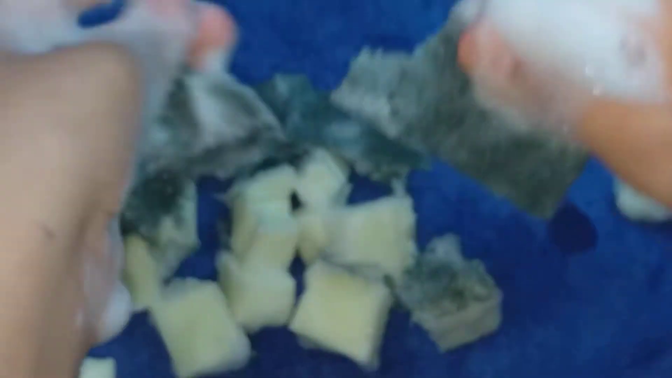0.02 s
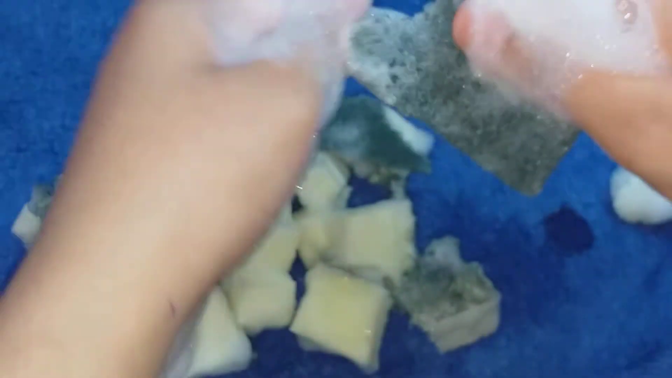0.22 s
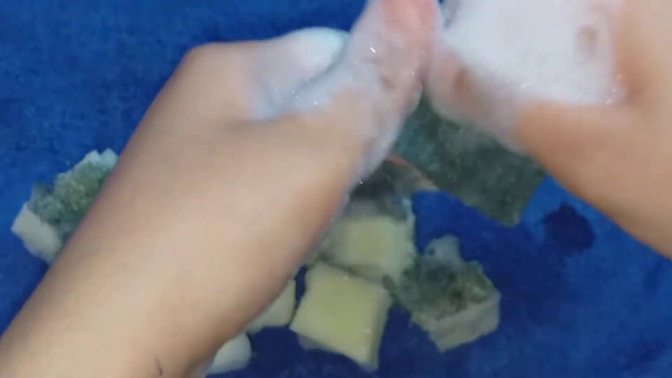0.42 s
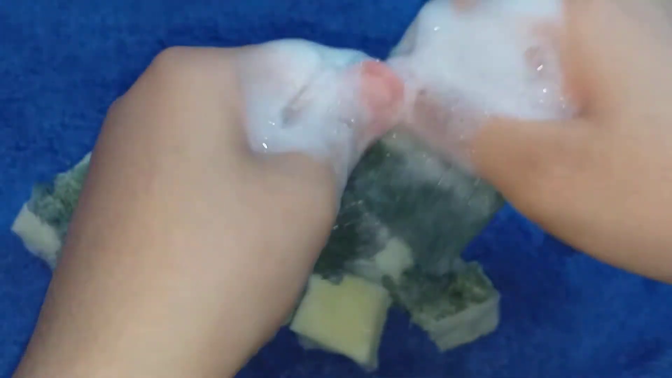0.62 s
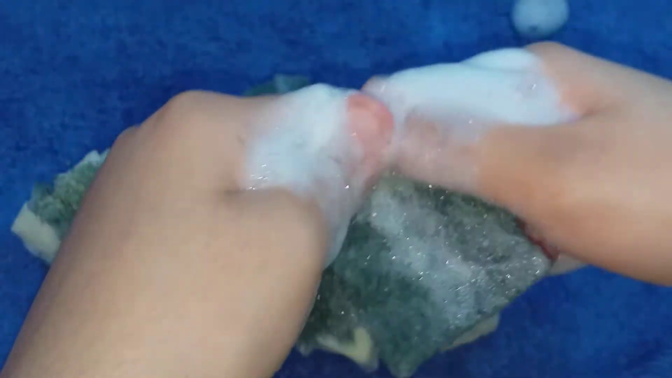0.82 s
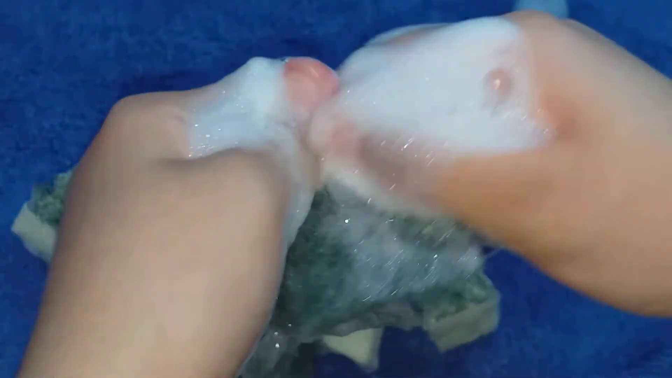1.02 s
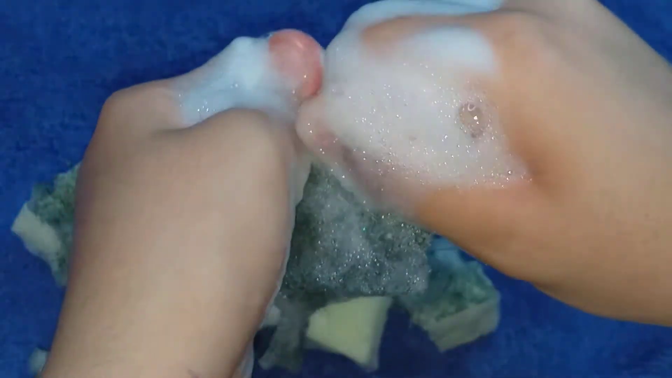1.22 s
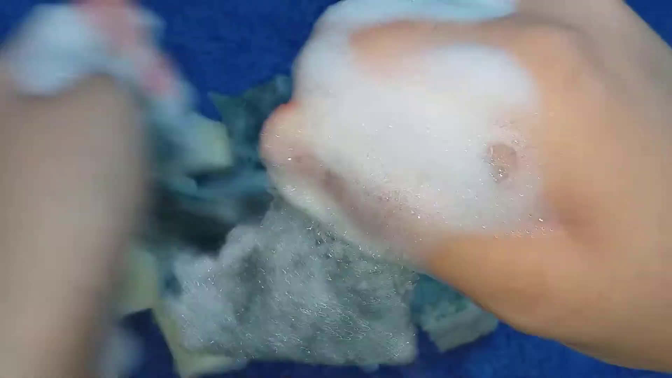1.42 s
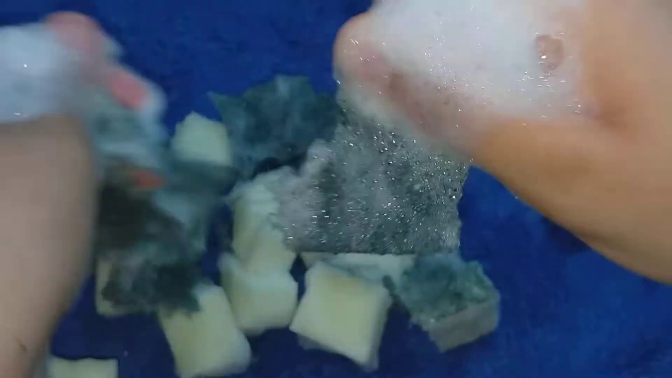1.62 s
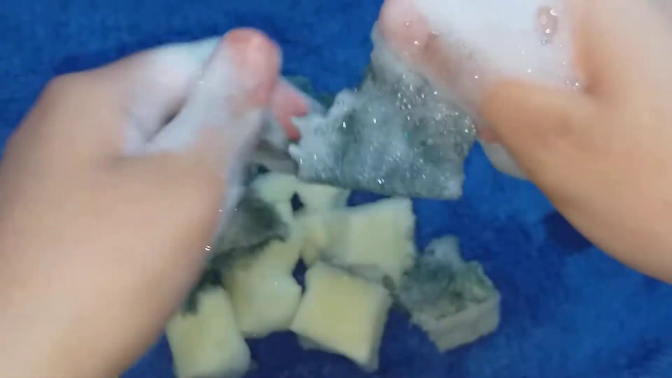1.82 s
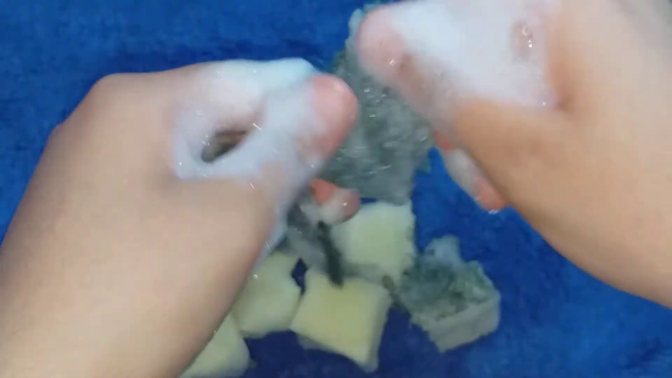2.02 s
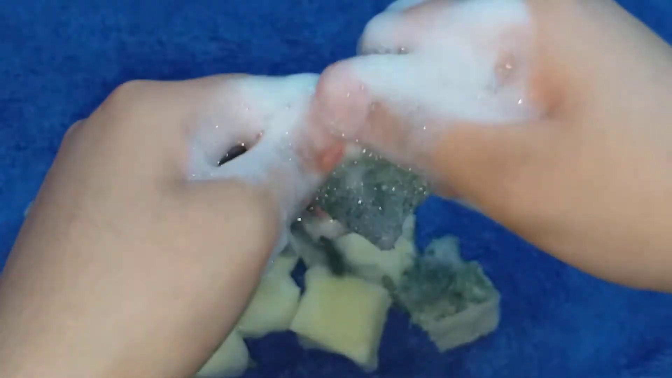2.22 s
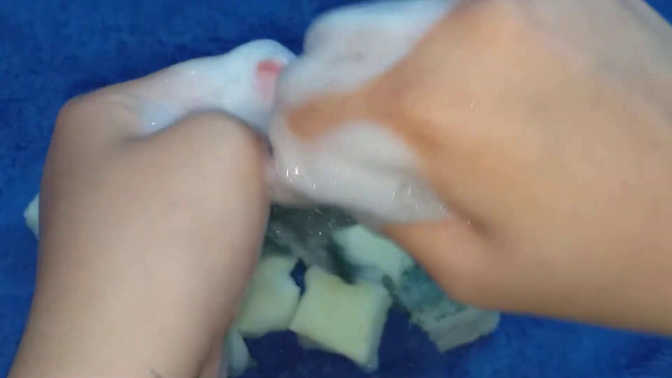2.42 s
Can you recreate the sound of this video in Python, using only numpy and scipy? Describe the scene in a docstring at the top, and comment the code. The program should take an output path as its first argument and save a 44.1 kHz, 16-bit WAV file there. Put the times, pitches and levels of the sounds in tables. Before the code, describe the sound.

A soapy scouring pad is torn by hand: a few hard knocks and faint creaks, then quickening fibre snaps and a short bright rip, then quiet foam fizz; close phone microphone in a small quiet room.

```python
"""Soapy hands tear a scouring pad close to a phone in a small quiet room: fibres snap one by one, then
the pad rips through. Snaps are bursts of noise with a short ring; tearing is clumps of tiny clicks.
The phone's mount creaks and knocks (damped sines), and foam fizzes and squishes (filtered clicks).
Low rumble, hiss and a chopped electric whine lie beneath (shaped noise and pulsed sines)."""
import sys
import numpy as np
from scipy import signal
from scipy.fft import rfft, irfft
from scipy.io import wavfile
from scipy.ndimage import map_coordinates

SR = 44100
rng = np.random.default_rng(int(sys.argv[2]) if len(sys.argv) > 2 else 0)


def invert_db(level):
    """Linear amplitude ratio for a level in decibels (20 dB per decade), elementwise."""
    return 10 ** (np.asarray(level, dtype=float) / 20)


def file_out(sig):
    """Save sig as 16-bit WAV at sys.argv[1]."""
    # one column per channel
    cols = np.atleast_2d(sig).T
    # limit, then scale
    lim = np.clip(cols, -1, 1)
    pcm = np.round(lim * 32767).astype(np.int16)
    wavfile.write(sys.argv[1], SR, pcm)


N = 110250  # samples: 2.5 s
T = np.arange(N) / SR

# colour of the hiss, also used for the noise in the whine: f/Hz, level/dB
HISS_COLOUR = [(250, -34), (400, -3.5), (700, 4.5), (1200, -8), (2000, -15), (3700, 6), (6000, -25),
               (7800, -1), (9800, 3), (11500, -5.5), (13600, -18), (15500, 3)]
# colour of coarse fibres breaking: f/Hz, level/dB
COARSE_FIBRES = [(350, -36), (600, -32), (1010, -8), (1160, -9), (1510, 0), (2290, -2), (2780, -7.5),
                 (3370, 2), (5010, -1), (6800, -17), (8840, -48), (15000, -120)]
# colour of fine fibres breaking: f/Hz, level/dB
FINE_FIBRES = [(3530, -16.5), (6000, -6), (6730, -17), (7280, -4.5), (10800, 0.5), (11100, -6),
               (12900, -12.5), (16000, -30)]


def unit(x):
    """Scales a sound to rms 1."""
    return x / np.sqrt(np.mean(x ** 2) + 1e-20)


def along(points, hz):
    """Reads a curve of (Hz, value) points on a log frequency axis."""
    f, v = np.transpose(points)
    return np.interp(np.log(hz + 1), np.log(f + 1), v)


def curves(rows):
    """Draws straight lines between timed rows: one value per sample for each column."""
    s, *cols = np.transpose(rows)
    return [np.interp(T, s, c) for c in cols]


def wobble(rate):
    """A smooth random curve with rate knots a second."""
    knots = rng.standard_normal(int(N * rate / SR) + 4)
    return map_coordinates(knots, [T * rate])


def noise():
    """Plain white noise for the whole scene."""
    return rng.standard_normal(N)


def coloured(x, spectrum):
    """Filters x to this spectrum without sounding ahead of time; white input keeps its rms."""
    m = 4096
    gain = invert_db(along(spectrum, np.fft.rfftfreq(m, 1 / SR)))
    # folding the cepstrum (spectrum of the log gain) forward gives a minimum-phase filter
    cepstrum = irfft(np.log(np.maximum(gain, 1e-5)), m)
    cepstrum = cepstrum * np.r_[1, 2 * np.ones(m // 2 - 1), 1, np.zeros(m // 2 - 1)]
    h = irfft(np.exp(rfft(cepstrum)), m)
    return signal.fftconvolve(x, h / np.linalg.norm(h))[:len(x)]


def grains(rate, spread_db, air):
    """Random clicks of uneven size, about rate a second, over a share (air) of plain noise."""
    sizes = invert_db(spread_db * rng.exponential(size=N)) * noise()
    clicks = (rng.random(N) < rate / SR) * sizes
    return unit(unit(clicks) + air * noise())


def ring(t, hz, db, t60, rise=0):
    """A struck part rings as a damped sine; its pitch gains 2 * rise of itself each second."""
    onset = 1 - np.exp(-t / 0.00012)
    return invert_db(db - 60 * t / t60) * np.sin(2 * np.pi * hz * t * (1 + rise * t)) * onset


def struck(t, modes, scrape):
    """A blow and a short scrape ring the modes, a little differently every time; peak 1."""
    scrape_peak_s, scrape_width_s, scrape_top_hz = 0.0013, 0.0018, 8600
    u = T[:SR // 200]
    swell = np.exp(-((u - scrape_peak_s) / scrape_width_s) ** 2)
    force = 0.25 * scrape * rng.standard_normal(len(u)) * swell
    force[0] = 1  # the blow itself
    if scrape > 1:
        force = signal.sosfilt(signal.butter(4, scrape_top_hz, fs=SR, output="sos"), force)
    x = sum(ring(t, *mode) * invert_db(rng.standard_normal()) for mode in modes)
    x = signal.fftconvolve(x, force)[:len(t)]
    return x / np.abs(x).max()


def add(out, s, x):
    """Mixes x into out at time s."""
    part = out[round(s * SR):][:len(x)]
    part += x[:len(part)]


def rumble():
    """Low noise whose level drifts."""
    # colour: f/Hz, level/dB
    rumble_colour = [(30, -3), (60, -1), (95, -12), (125, 2), (155, 1), (180, -14.5), (250, -9.5),
                     (330, -19.5), (600, -29.5), (1000, -72)]
    # loudness, before the 2 dB lift and wobble below: t/s, level/dB
    rumble_path = [(0.5, -65), (0.55, -68.5), (0.789, -67.5), (1.04, -65), (1.42, -71), (1.59, -70.5),
                   (1.72, -70), (1.95, -71), (2.31, -68.5), (2.5, -69)]
    level_db = curves(rumble_path)[0] + 2.0 + 0.26 * wobble(24)
    return invert_db(level_db) * unit(coloured(noise(), rumble_colour))


def hiss():
    """Steady coloured noise with a slight wobble in level."""
    return invert_db(-81.5 + 0.77 * wobble(15)) * coloured(noise(), HISS_COLOUR)


def whine():
    """Four electric tones and a spit of noise, switched on briefly many times a second."""
    # one pitch per tone: f/Hz
    tone_hz = [3351.8, 7302.5, 9156.9, 11311.4]
    # one level per tone, before the shared wobble: level/dB
    tone_db = [-78, -85, -75, -80]
    chop_hz, chop_start_s = 299.27, 0.003054
    tone_sharp, spit_sharp = 18, 36  # higher makes shorter pulses
    gate = np.cos(2 * np.pi * chop_hz * (T - chop_start_s)) - 1
    out = np.zeros(N)
    for hz, db in zip(tone_hz, tone_db):
        tone = np.sin(2 * np.pi * (hz * T + rng.random()))
        out += invert_db(db) * unit(np.exp(tone_sharp * gate) * tone)
    spit = unit(np.exp(spit_sharp * gate) * noise())
    out += invert_db(-76) * coloured(spit, HISS_COLOUR)
    return invert_db(0.48 * wobble(45.6)) * out


def fizz():
    """Tiny bubbles burst in the lather: a dense stream of clicks with a fluttering level."""
    # loudness, before the 10.5 dB cut and flutter below: t/s, level/dB
    fizz_path = [(0.0, -56.5), (0.8, -60), (1.08, -59.5), (1.2, -60.5), (1.33, -98), (1.36, -48),
                 (1.5, -58), (1.8, -61), (2.05, -63), (2.5, -58.5)]
    # colour: f/Hz, level/dB
    fizz_colour = [(470, -54.5), (800, -20), (1030, -10), (2110, -8), (2570, -10), (3960, -5.5),
                   (6760, -12), (10100, -4.5), (13000, -12.5)]
    flutter_db = 1.2 * wobble(40)
    return invert_db(curves(fizz_path)[0] - 10.5 + flutter_db) * coloured(grains(5700, 1.5, 1.2), fizz_colour)


def squishes():
    """Now and then the foam squishes: bubble clicks in one band swell and fade."""
    # middle, width of the swell, loudness and centre of the band: t/s, length/s, level/dB, f/Hz
    squish_rows = [(0.768, 0.041, -69, 1860), (1.716, 0.12, -78, 1460), (2.165, 0.049, -74, 1920),
                   (2.424, 0.14, -68, 3870)]
    out = np.zeros(N)
    for s, length, db, hz in squish_rows:
        band = [(hz / 1.4, -40), (hz / 1.3, -6), (hz, 0), (hz * 1.4, -6), (hz * 3.3, -25)]
        swell = np.exp(-(2 * (T - s) / length) ** 2)
        out += invert_db(db) * swell * coloured(grains(1300, 1.0, 0.34), band)
    return out


def creaks():
    """Faint creaks of the mount ring a hollow part, each with a small tick."""
    # each creak, levels before the trims below: t/s, level/dB, tick against hollow ring/dB
    creak_rows = [(0.621, -48.5, -4.5), (0.688, -51.5, -7), (0.697, -46.5, -11.5), (0.708, -50, -4),
                  (0.796, -54, -4), (0.841, -65, -1), (0.887, -56.5, 0.5), (0.984, -65, -17),
                  (1.047, -50.5, -5.5), (1.083, -59, -5)]
    # rings of the hollow part: f/Hz, relative level/dB, t60/s
    hollow_modes = [(997, 4.5, 0.021), (1357, -5.5, 0.023), (526, -19, 0.027)]
    # rings of the tick: f/Hz, relative level/dB, t60/s
    tick_modes = [(4440, -0.5, 0.0017), (7020, -6, 0.0035), (7670, -8.5, 0.0038)]
    out, t = np.zeros(N), T[:SR // 8]
    onset = 1 - np.exp(-t / 0.00066)
    for s, db, tick_db in creak_rows:
        shift = 1 + 0.015 * rng.standard_normal()  # every creak differs slightly in pitch
        hollow = sum(ring(t, hz * shift, g + 2 * rng.standard_normal(), t60)
                     for hz, g, t60 in hollow_modes) * onset
        tick = invert_db(tick_db + 7) * struck(t, tick_modes, 2.3)
        add(out, s, invert_db(db - 1.5) * (hollow + tick))
    return out


def knocks():
    """Each knock of the mount rings the case and pushes the body; only the hardest set off a low thump."""
    # each knock: t/s, case peak/dB, main ring f/Hz, scrape strength, body against case peak/dB
    knock_rows = [(.0140, -33, 7100, 1.3, -7.5), (0.0722, -27, 1410, 2, -29),
                  (0.1492, -42.5, 8000, 2.4, -16), (0.2065, -22, 3540, 0.39, -8.5),
                  (0.2158, -33, 3600, 0.39, 0.5), (0.2752, -10.5, 4660, 0.13, -33),
                  (0.2803, -8.5, 4430, 0.16, -14.5), (.4006, -25.5, 6060, 5.8, -7),
                  (0.4803, -33, 3700, 5.4, -8)]
    # rings of the case: f/Hz, relative level/dB, t60/s
    case_modes = [(4354, 6.5, 0.0024), (6777, -0.5, 0.0031), (2408, -5, 0.0032), (1410, -22, 0.0049),
                  (7650, -4, 0.0031), (3500, -3.5, 0.00098)]
    # rings of the body: f/Hz, relative level/dB, t60/s
    body_modes = [(188, 1.5, 0.006), (322, -10.5, 0.016), (747, -15.5, 0.029), (1030, -32.5, 0.0083)]
    # thump: f/Hz, level at a -9.5 dB knock/dB, t60/s
    thump_mode = (122, -30.5, 0.028)
    main_t60_s, main_rise = 0.0034, 5.06
    thump_growth = 9.1  # dB per dB of knock: softer knocks have no audible thump
    out, t = np.zeros(N), T[:SR // 8]
    body = -sum(ring(t, *mode) for mode in body_modes)
    for s, db, hz, scrape, body_db in knock_rows:
        case = struck(t, case_modes + [(hz, 3, main_t60_s, main_rise)], scrape)
        add(out, s, invert_db(db) * (case + invert_db(body_db) * body))
        add(out, s, -invert_db(thump_growth * (db + 9.5)) * ring(t, *thump_mode))
    return out


def room(x):
    """Echoes blur into a tail of noise in which each frequency dies at its own speed."""
    # how long the room rings: f/Hz, t60/s
    room_t60 = [(300, 0.38), (2000, 0.27), (6000, 0.2), (14000, 0.11)]
    hz, t, z = signal.stft(rng.standard_normal(SR // 3), SR, nperseg=256)
    fade = invert_db(-60 * t / along(room_t60, hz)[:, None])
    tail = signal.istft(z * fade, SR, nperseg=256)[1]
    return signal.fftconvolve(x, tail / np.linalg.norm(tail))[:N]


def shudder():
    """The pad shudders as it gives: low noise in a few quick swells."""
    # loudness: t/s, level/dB
    shudder_path = [(1.35, -110), (1.375, -61.5), (1.41, -55), (1.42, -42.5), (1.44, -64), (1.462, -48.5),
                    (1.475, -66), (1.5, -84), (1.54, -110)]
    # colour: f/Hz, level/dB
    shudder_colour = [(60, -7), (130, -4), (300, -5), (500, -12.5), (800, -1.5), (1200, -32.5)]
    return invert_db(curves(shudder_path)[0]) * coloured(noise(), shudder_colour)


def snaps():
    """Each single fibre cracks as a burst of noise and rings briefly; fine ones crack brighter."""
    # each fibre, level before the 2 dB cut and 0.7 ms delay below: t/s, level/dB, f/Hz
    snap_rows = [(0.5787, -51.5, 4200), (1.125, -50, 3830), (1.1665, -41, 5060), (1.1697, -36, 1920),
                 (1.1754, -43, 4030), (1.1824, -43, 3940), (1.192, -38, 4130), (1.196, -44, 3000),
                 (1.2004, -33, 4370), (1.2078, -27.5, 4200), (1.2228, -31, 5400), (1.2297, -37, 4130),
                 (1.236, -41, 4180), (1.244, -40, 3000), (1.2487, -31.5, 3500), (1.268, -34, 4270),
                 (1.2715, -29.5, 3740), (1.2782, -43, 3610), (1.2927, -35, 5300), (1.3096, -33, 3870),
                 (1.3152, -43, 4030), (1.3252, -36.5, 4970), (1.3622, -40, 3450), (1.3678, -30, 4280),
                 (1.3725, -29, 3500), (1.376, -23, 3400), (1.3798, -21, 2000), (1.3835, -21, 3700),
                 (1.4159, -17, 9100), (1.4208, -21, 9000), (1.44, -18, 8000), (1.4465, -21, 9800),
                 (1.4548, -21, 10500), (1.4606, -21, 9800), (2.033, -55, 3950), (2.249, -55, 4020),
                 (2.4304, -44, 4220), (2.438, -48, 4250), (2.4618, -43, 4050), (2.4678, -42, 4090)]
    fine_hz, top_hz = 7000, 13000  # a fibre ringing above the first counts as fine
    crack_t60_s, ring_t60_s = 0.0055, 0.004
    out, t = np.zeros(N), T[:SR // 25]
    onset = 1 - np.exp(-t / 0.000082)
    for s, db, hz in snap_rows:
        fine_db = 5 if hz > fine_hz else -5
        colour = [p for p in COARSE_FIBRES if p[0] < fine_hz]
        colour += [(f, g + fine_db) for f, g in FINE_FIBRES if fine_hz < f < top_hz]
        colour += [(15000, -40.5)]
        crack = coloured(invert_db(-60 * t / crack_t60_s) * rng.standard_normal(len(t)), colour)
        x = crack / np.abs(crack).max() + ring(t, hz, -3, ring_t60_s) * onset
        add(out, s + 0.0007, invert_db(db - 2) * x)
    return out


def tearing(rows, rate, spread_db, air, clumps_per_s, steady):
    """Fibres break in sudden clumps that die away; coarse ones feed a lower band, fine ones an upper."""
    level_db, treble_db = curves(rows)
    starts = (rng.random(N) < clumps_per_s / SR) * rng.random(N)
    decay = np.exp(-T[:SR // 40] / 0.0015)  # one clump dies away in milliseconds
    clumps = unit(signal.fftconvolve(starts, decay)[:N])
    clumps = unit(steady + clumps)
    coarse = coloured(clumps * grains(rate, spread_db, air), COARSE_FIBRES)
    fine = coloured(clumps * grains(rate, spread_db, air), FINE_FIBRES)
    x = coarse + invert_db(treble_db) * fine
    return x * invert_db(level_db) * (T > rows[0][0]) * (T < rows[-1][0])


def stretch():
    """The pulled pad stretches: sparse, uneven fibre breaks."""
    # pull on the pad, level before the 1.5 dB cut below: t/s, level/dB, treble against it/dB
    stretch_path = [(1.1, -70.5, -25), (1.142, -67, -15), (1.15, -71, -21), (1.17, -77, 5),
                    (1.184, -64.5, 2), (1.208, -49, -8.5), (1.26, -57.5, -3), (1.272, -46, -13),
                    (1.286, -63, -2), (1.33, -64.5, -2), (1.352, -63, -16), (1.355, -68, -25)]
    return invert_db(-1.5) * tearing(stretch_path, 2000, 2.5, 0.4, clumps_per_s=500, steady=0.65)


def rip():
    """The pad rips through: dense, more even fibre breaks."""
    # force of the rip, level before the 0.5 dB lift below: t/s, level/dB, treble against it/dB
    rip_path = [(1.367, -55, -14), (1.372, -40.5, -13), (1.378, -36, -13), (1.39, -34, -12),
                (1.41, -35, 1.5), (1.4155, -43, 4.5), (1.43, -39, 1.5), (1.443, -41, 6.5), (1.455, -44, 9),
                (1.461, -48.5, 10), (1.4625, -79, -12)]
    return invert_db(0.5) * tearing(rip_path, 8000, 1.2, 0.7, clumps_per_s=500, steady=1.35)


def scene():
    """Everything at one microphone; only the tearing pad gets the room's echo."""
    background = rumble() + hiss() + whine()
    foam = fizz() + squishes()
    mount = creaks() + knocks()
    tear = shudder() + snaps() + stretch() + rip()
    return (background + foam + mount + tear + invert_db(-16) * room(tear))[None]


def band_limit(x):
    """A steep low-pass at the top of the band."""
    return signal.sosfilt(signal.butter(12, 16490, fs=SR, output="sos"), x)


def record(dry):
    """The phone cuts the deepest bass and the top."""
    low_cut_hz, top_hz = 70, 15950
    x = signal.sosfilt(signal.butter(4, low_cut_hz, "high", fs=SR, output="sos"), dry)
    x = signal.sosfiltfilt(signal.cheby2(16, 14, top_hz, fs=SR, output="sos"), x)
    return band_limit(x)


dry = scene()
out = record(dry)
file_out(out)
```